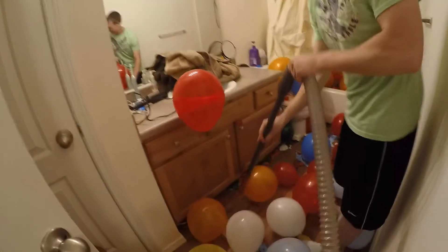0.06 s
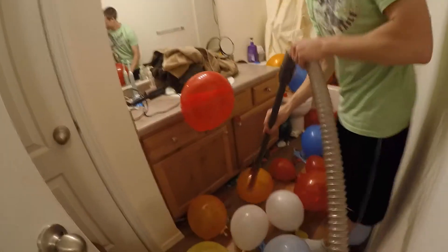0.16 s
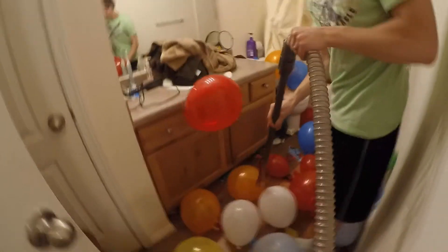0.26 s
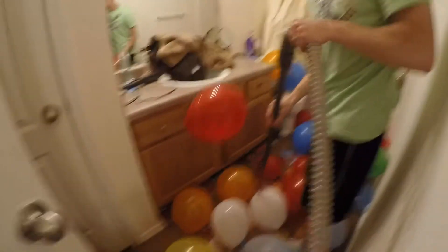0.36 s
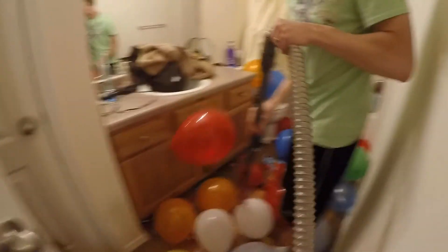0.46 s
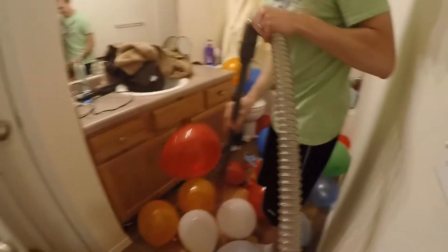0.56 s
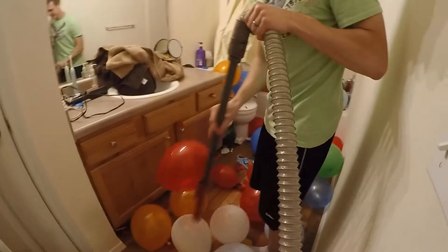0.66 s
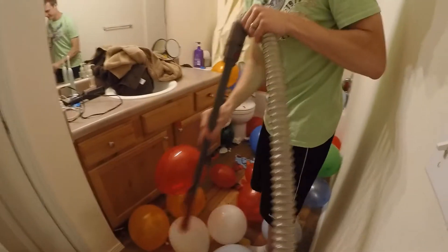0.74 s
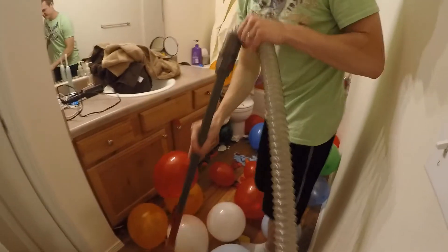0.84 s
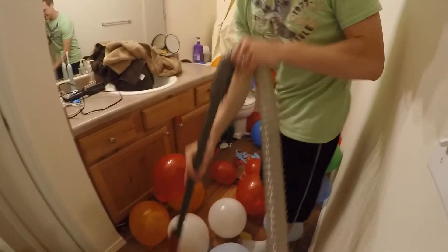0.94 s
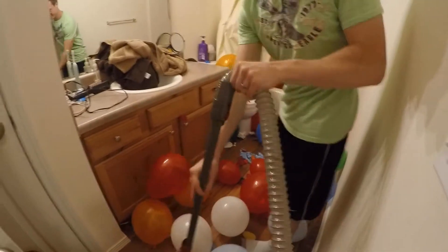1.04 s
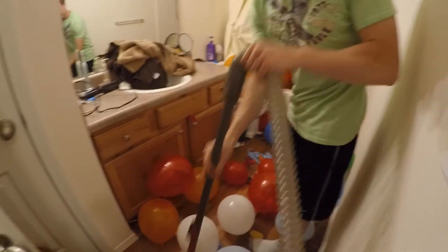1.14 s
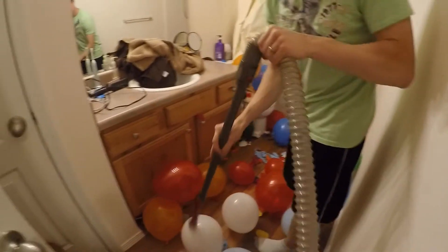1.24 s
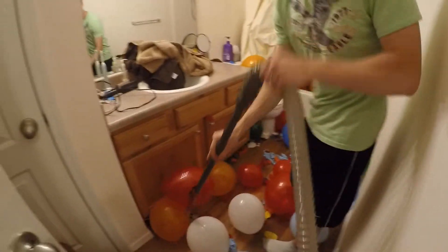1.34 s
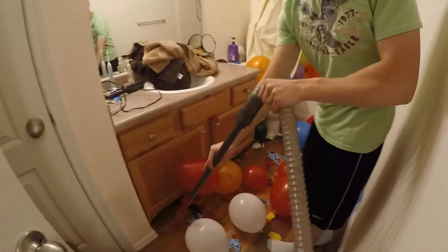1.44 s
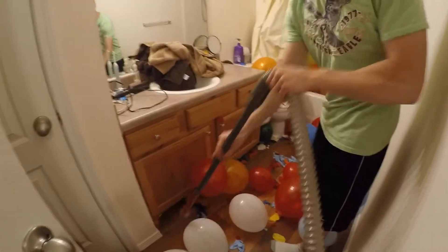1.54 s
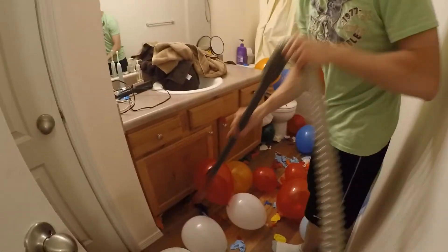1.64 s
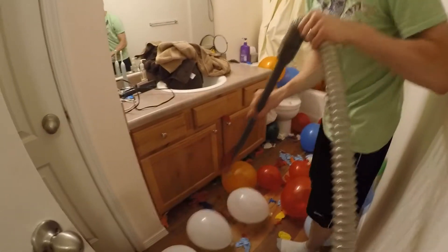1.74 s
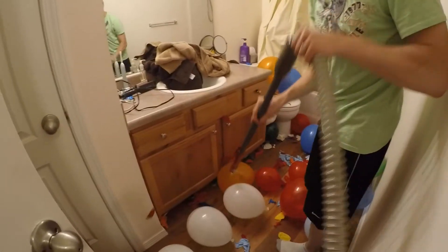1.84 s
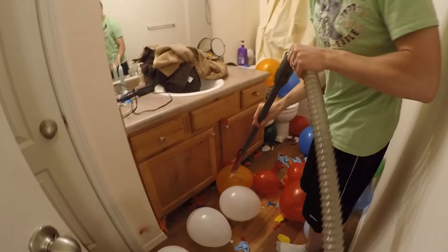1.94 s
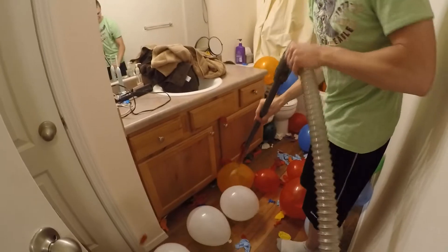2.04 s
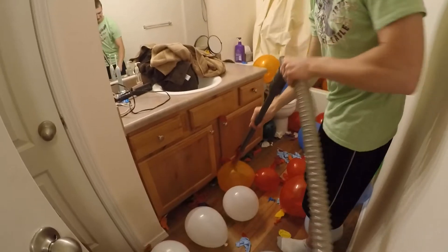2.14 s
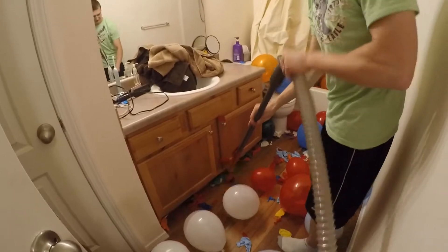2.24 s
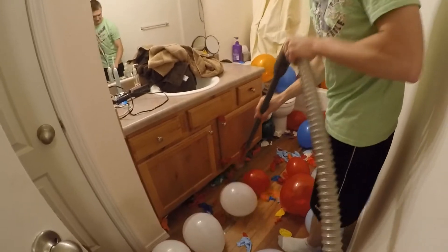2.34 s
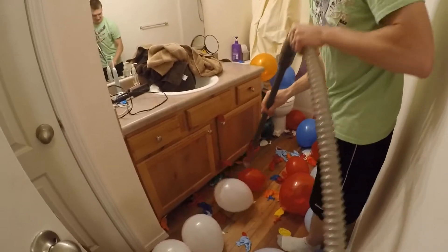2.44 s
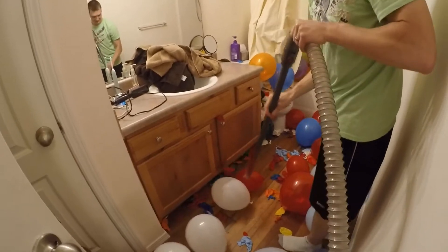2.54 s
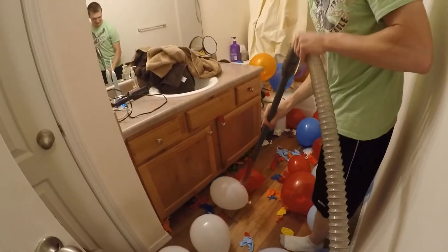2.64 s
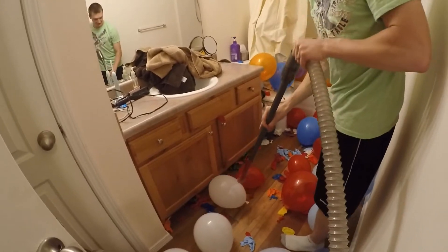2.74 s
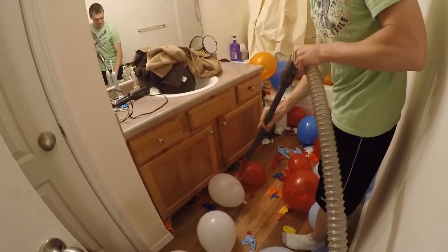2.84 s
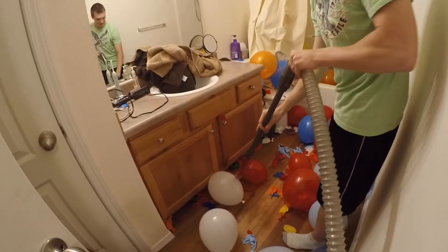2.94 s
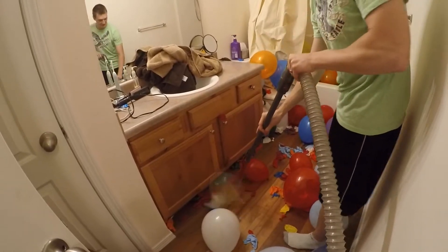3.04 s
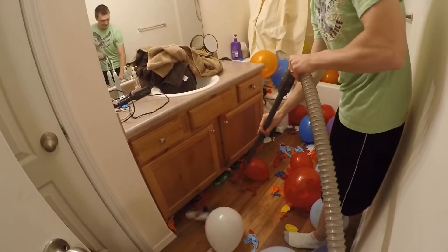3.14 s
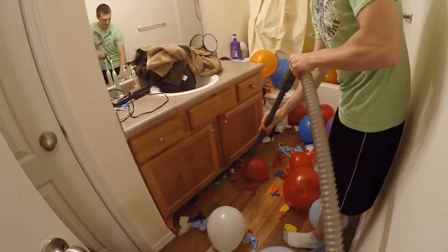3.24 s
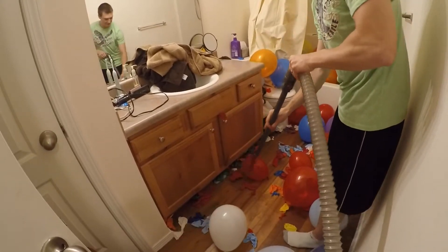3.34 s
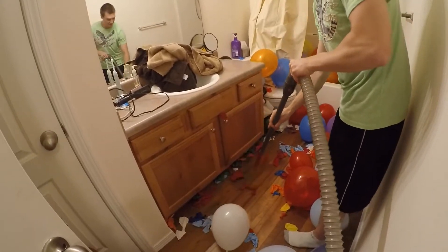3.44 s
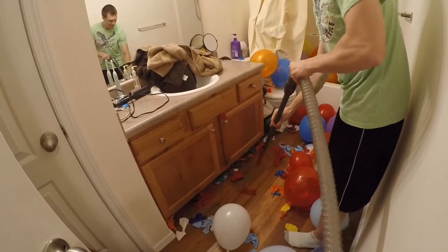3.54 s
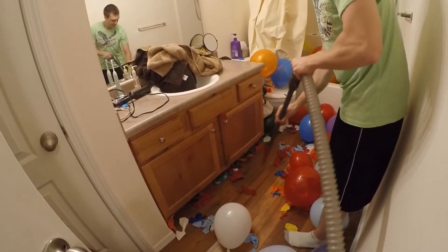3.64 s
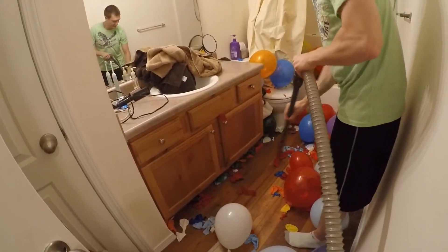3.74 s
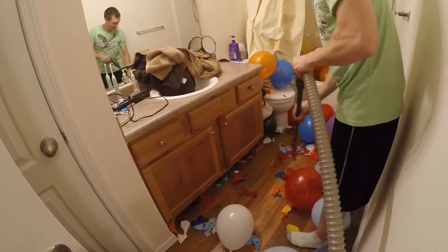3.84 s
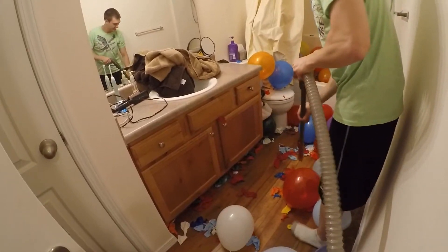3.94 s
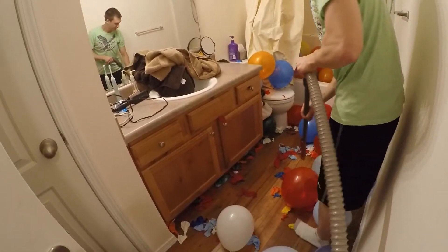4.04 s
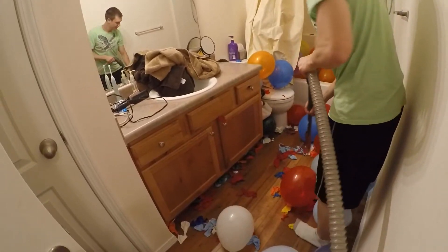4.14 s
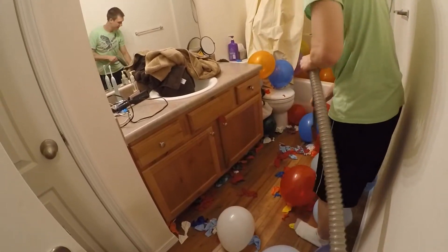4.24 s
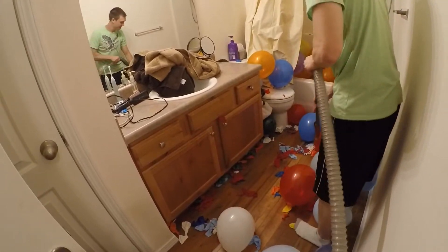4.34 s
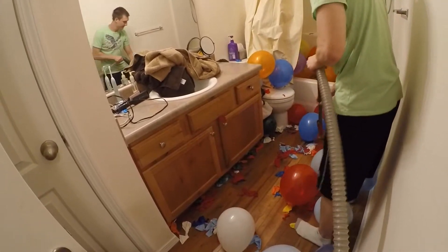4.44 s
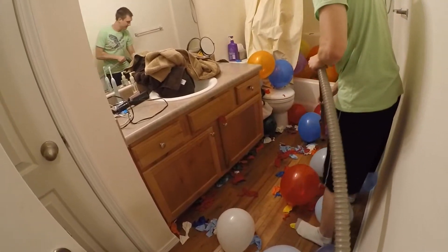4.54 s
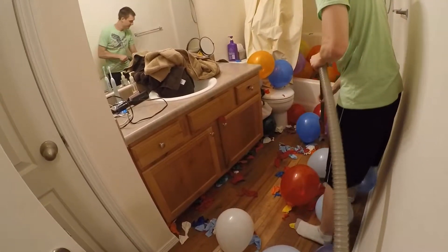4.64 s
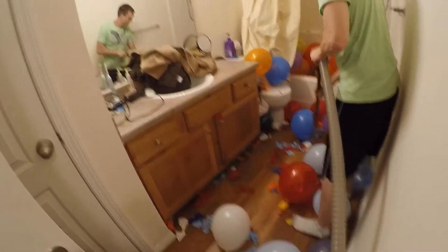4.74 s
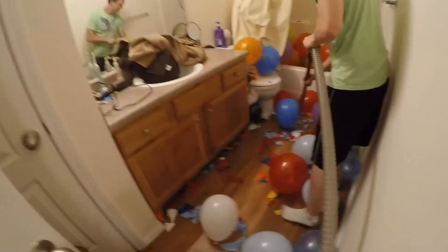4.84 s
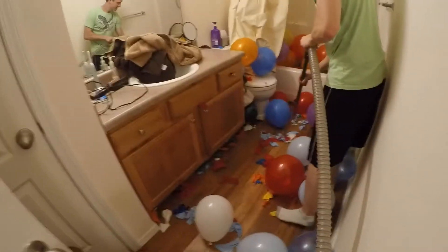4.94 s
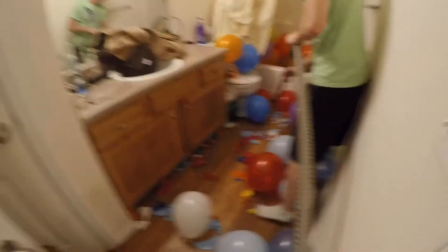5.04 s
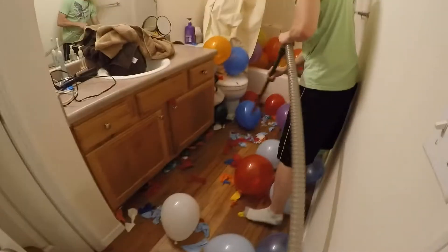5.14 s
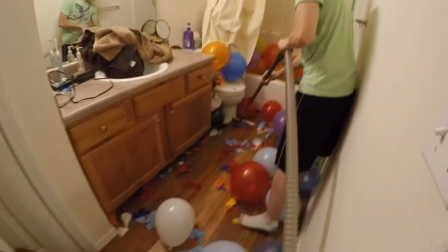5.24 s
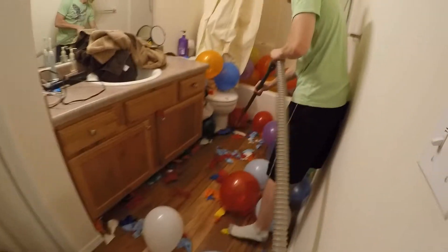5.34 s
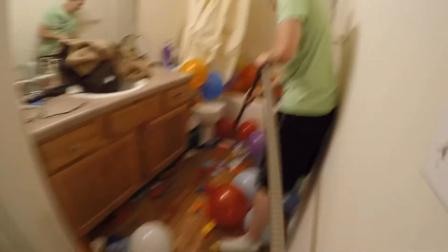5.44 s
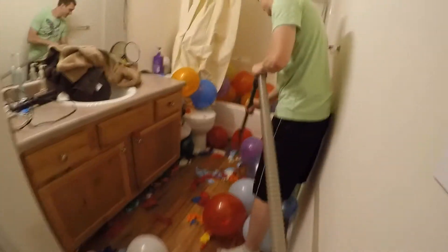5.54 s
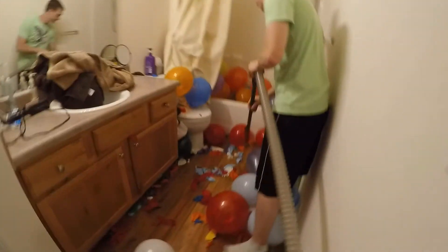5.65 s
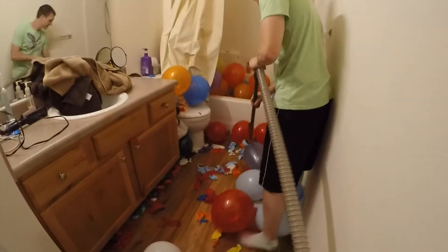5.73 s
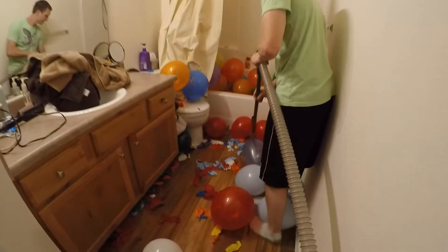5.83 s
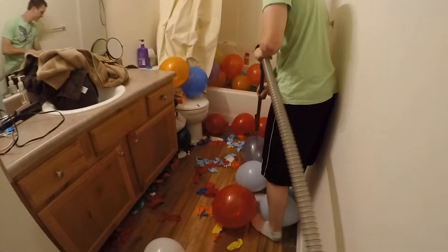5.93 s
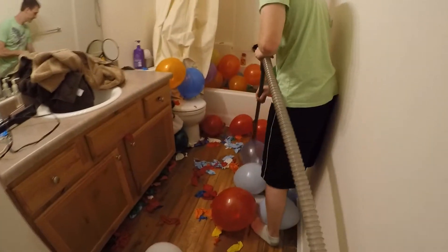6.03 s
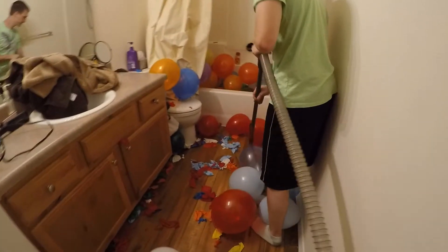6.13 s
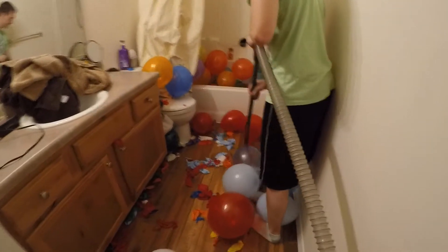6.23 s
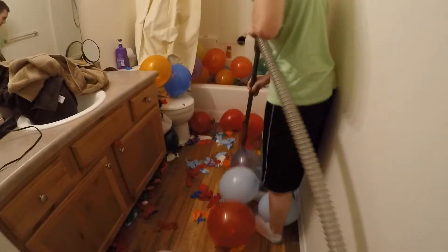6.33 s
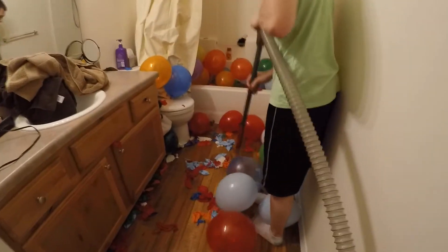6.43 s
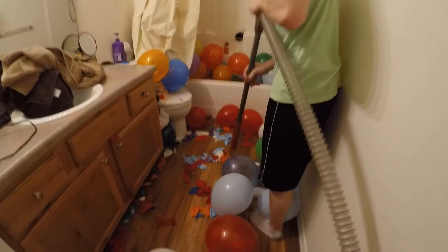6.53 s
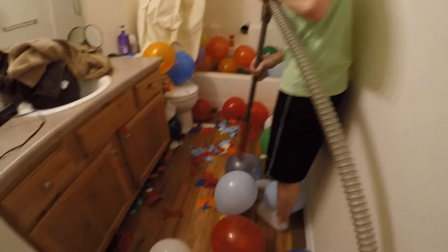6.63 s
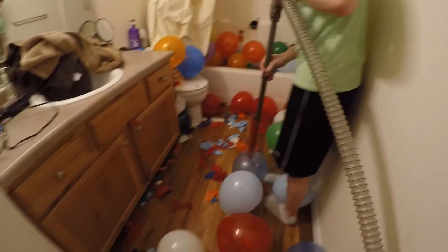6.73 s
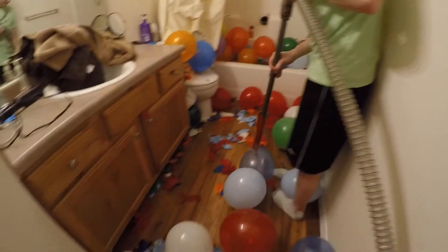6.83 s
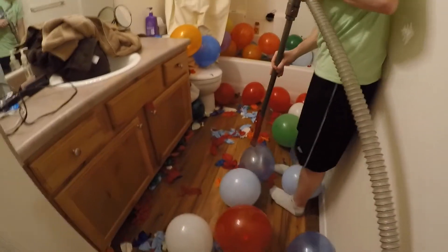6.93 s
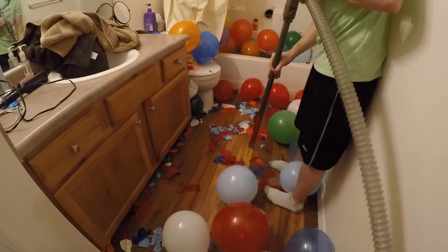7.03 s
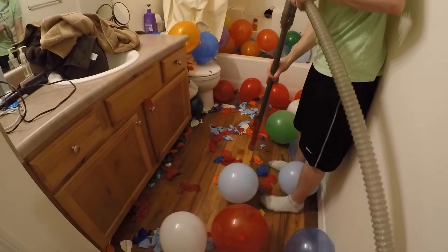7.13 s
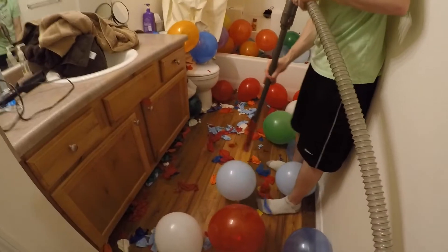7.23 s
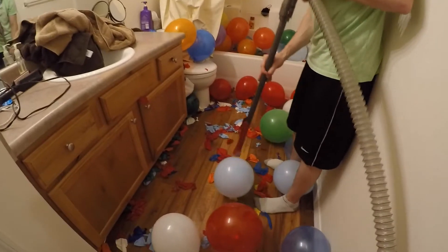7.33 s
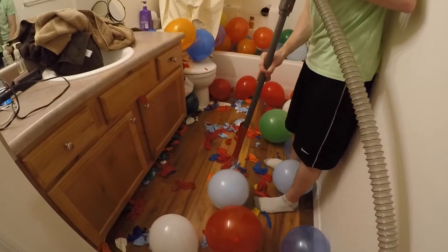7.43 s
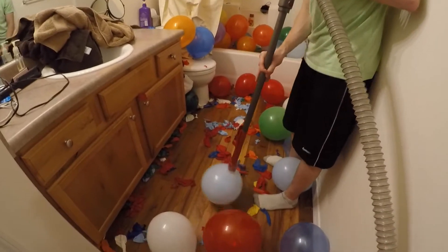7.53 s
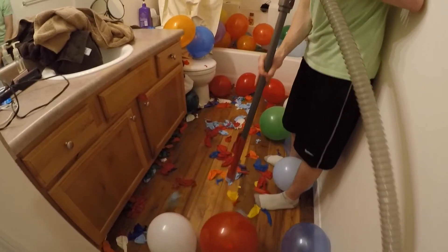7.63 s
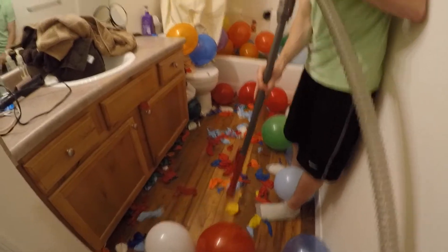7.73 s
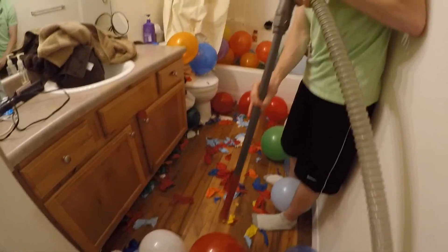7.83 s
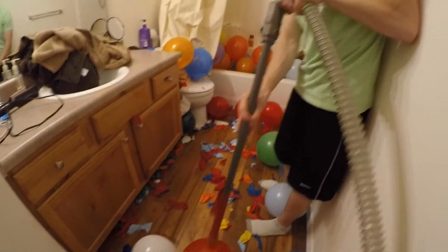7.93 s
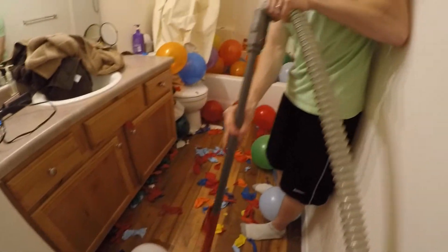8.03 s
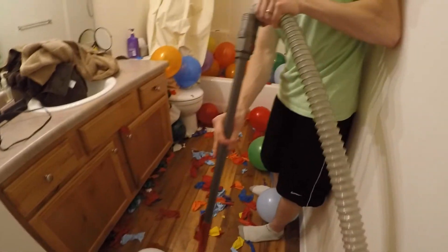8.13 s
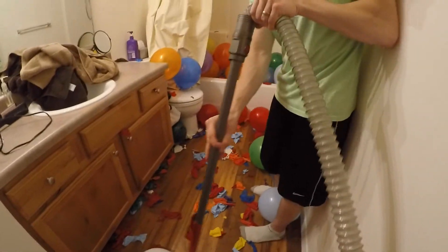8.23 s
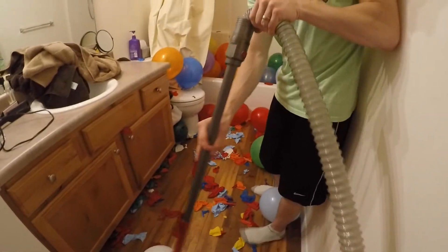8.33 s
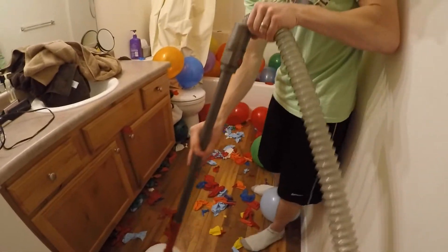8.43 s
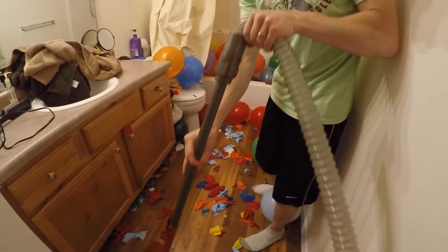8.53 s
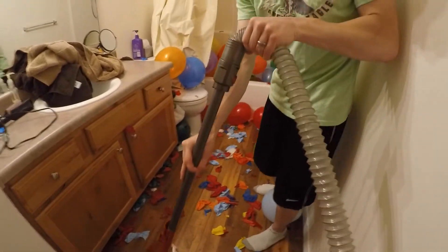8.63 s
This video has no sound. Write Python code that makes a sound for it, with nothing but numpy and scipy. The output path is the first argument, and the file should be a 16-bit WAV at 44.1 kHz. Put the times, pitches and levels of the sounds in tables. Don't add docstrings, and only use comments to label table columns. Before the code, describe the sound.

The tail of an earlier pop fades into vacuum suction, then balloons explode every half second or so, very loud against the quiet air rush. The close handheld microphone overloads on each boom, and hard walls answer with a brief fluttering ring. A longer gap follows around the middle, with rising hiss, tiny scrap ticks and soft bumps, before four final bursts.

```python
import sys
import numpy as np
from scipy import signal
from scipy.fft import rfft, irfft, next_fast_len
from scipy.io import wavfile

SR = 44100
rng = np.random.default_rng(int(sys.argv[2]) if len(sys.argv) > 2 else 0)


def inscribe(sig):
    pcm = np.round(np.clip(np.atleast_2d(sig).T, -1, 1) * 32767)
    wavfile.write(sys.argv[1], SR, pcm.astype(np.int16))


def how_loud(loudness_db):
    steps = np.asarray(loudness_db, float) / 20
    return 10 ** steps


N = 382788

# (t/s, swing f/Hz, overload level/dB)
FREED_AIR = [(.9514, 245, 8), (1.3931, 250, 9), (1.7125, 205, 7), (2.2255, 230, 3), (3.0605, 260, 6),
             (3.4392, 210, 2), (3.8602, 200, 4), (4.4657, 205, 8), (5.2072, 205, 9), (5.6192, 195, 8),
             (7.0522, 200, 6), (7.5958, 230, 5), (8.0050, 200, 4), (8.5583, 220, 12), (-.075, 220, 6)]
# (t/s, low level/dB, 1.5 kHz level/dB, bright level/dB, gain left after it/dB)
ROOM_ANSWERS = [(0.95, -5.5, -13, -11.5, -42), (1.39, -4, -13.5, -13, -40), (1.712, -9, -12, -11.5, -42.5),
                (2.224, -11, -7, -9.5, -41.5), (3.057, -7.5, -10.5, -12, -40),
                (3.437, -10.5, -12, -12, -38), (3.86, -13, -10, -12, -36), (4.466, -5, -9.5, -9.5, -39),
                (5.207, -4, -13, -8.5, -39.5), (5.62, -8.5, -9.5, -5.5, -43.5), (7.05, -9, -9.5, -10, -42),
                (7.593, -10, -11, -9.5, -40.5), (8.002, -9, -10.5, -9, -41.5),
                (8.556, -9.5, -14.5, -11, -39)]
# (t/s, slap level/dB, slap f/Hz, flutter level/dB, flutter f/Hz)
SLAPS = [(0.9548, -8.5, 9500, -12, 1125), (1.3939, -10.5, 4220, -14, 1024), (1.7129, -12, 4400, -9, 1639),
         (2.226, -18.5, 6200, -7.5, 1803), (3.0607, -12, 5270, -7, 1370), (3.4392, -17, 3930, -10, 1733),
         (3.8612, -16, 2770, -4.5, 1660), (4.4677, -10, 2540, -10, 2310), (5.2083, -14, 3670, -17, 1930),
         (5.6204, -10, 6560, -7, 1667), (7.0529, -5, 2800, -4.5, 1366), (7.5963, -8, 2650, -10, 1190),
         (8.0066, -10, 7550, -10, 1637), (8.5627, -9, 9600, -11, 1153)]
EARLIER_ANSWER, EARLIER_SPOT = (-.075, -6, -7, -10.5, -38.5), (-.075, -8, -23, -6.5, -1.5)
THIRD_OCTAVES_HZ = 32 * 2 ** np.arange(0, 9.3, 1 / 3)
TEAR_S = .0013
STEP_IN_S = (5.33, 5.38)
DUCK_AHEAD_S = .016
SEAL_S = 0.07


def rms_one(x):
    return x / np.sqrt(np.mean(x ** 2) + 1e-20)


def at_hz(points, hz):
    points = np.array(points)
    return np.interp(np.log(hz), np.log(points[:, 0]), points[:, 1])


def band(x, low, high):
    return signal.sosfilt(signal.butter(2, [low, high], "band", fs=SR, output="sos"), x)


def drift(rate):
    r = np.exp(-80 * np.pi * rate / SR)
    draws = rng.standard_normal(N // 40 + 2002)
    slow = signal.lfilter([1], [1, -2 * r, r * r], draws)[2000:]
    return np.interp(np.arange(N) / 40, np.arange(len(slow)), rms_one(slow))


def resonance(x, hz, width):
    r = np.exp(-np.pi * width / SR)
    poles = [1, -2 * r * np.cos(2 * np.pi * hz / SR), r * r]
    return signal.lfilter([(1 - r * r) / 2, 0, (r * r - 1) / 2], poles, x)


def add(out, x, s):
    i = round(s * SR)
    x = x[max(-i, 0):N - i]
    out[max(i, 0):max(i, 0) + len(x)] += x


def burst(boom, answer, spot, top_db):
    t = np.arange(round(.6 * SR)) / SR
    late = np.maximum(t - TEAR_S, 0)
    white = rng.standard_normal((2, len(t)))
    tear = 0.17 * np.sin(2 * np.pi * t / TEAR_S) * (t < TEAR_S)
    rise = 1 - np.exp(-t / .0013)
    rip = how_loud(7.3 - 60 * t / 0.016) * rise * band(white[1], 1260, 2600)
    build = 1 - np.exp(-(late / 0.00077) ** 2)
    ringing = how_loud(-4.5) * build * room_modes(t, spot)
    hiss = how_loud(19.0) * rise * room_tail(t, white, answer, spot[-1], top_db)
    return tear + rip + air_swing(late, *boom) + ringing + hiss


def air_swing(late, hz, overload_db):
    fade = np.exp(-(late * hz / 1.6) ** 4)
    swing = how_loud(overload_db - 2) * np.sin(2 * np.pi * hz * late) * fade
    return band(swing, 52, 4000)


def room_modes(t, spot):
    # (f/Hz, level/dB, t60/s)
    modes = [(65, -14, 0.42), (129.5, 5.5, 0.13), (177.8, -7, 0.28), (213.8, -2.5, 0.28), (229.4, -5, 0.42),
             (290.4, -4.5, 0.38), (343.7, -4, 0.36), (472.3, 0, 0.12), (651, -9, 0.32), (916, -16, 0.37)]
    feed = np.c_[[110, 180, 230, 300, 560], [*spot[:-1], -11.5, spot[-1] - 8.0]]
    ringing = 0
    for hz, level_db, t60 in modes:
        strength_db = level_db + at_hz(feed, hz) + rng.normal(0, 1.3)
        ringing = ringing + how_loud(strength_db - 60 * t / t60) * np.sin(2 * np.pi * (hz * t + rng.random()))
    return ringing


def room_tail(t, white, answer, upper_db, top_db):
    # (f/Hz, level per Hz/dB)
    colour = [(18, -52), (30, -32), (90, -21), (199, -1.5), (384, -9), (526, -11.5), (600, -18),
              (1810, -15), (2750, -25.5), (6550, -27), (11700, -30.5), (14800, -32), (16000, -59)]
    # (f/Hz, t60/s)
    reverb = [(60, 0.6), (160, 0.34), (420, 0.32), (1100, 0.34), (2900, 0.31), (7700, 0.32), (14000, .22)]
    low_db, mid_db, bright_db, _ = answer
    bright_db = bright_db + 8.5
    own = np.c_[[280, 560, 1500, 6000, 12000],
                [low_db, upper_db, mid_db + 5.5, bright_db, bright_db + top_db]]
    tail = 0
    for k, (low, high) in enumerate(zip(THIRD_OCTAVES_HZ, THIRD_OCTAVES_HZ[1:])):
        hz = np.sqrt(low * high)
        decay_db = 60 * t / at_hz(reverb, hz)
        tail = tail + how_loud(at_hz(colour, hz) + at_hz(own, hz) - decay_db) * band(white[k % 2], low, high)
    return tail


def flutter():
    out, t = np.zeros(N), np.arange(round(.3 * SR)) / SR
    rise = 1 - np.exp(-t / .0012)
    for (s, *_), (*_, peak_db, hz) in zip(FREED_AIR, SLAPS):
        spread = np.linspace(-.14, .14, num=6)[:, None] + rng.normal(0, 0.0183, (6, 1))
        phase = rng.random((6, 1))
        ring = np.sin(2 * np.pi * (hz * (1 + spread) * t + phase)).sum(axis=0)
        add(out, how_loud(peak_db - 16.0 - 60 * t / 0.31) * rise * ring, s - TEAR_S)
    return out


def snaps(table, gain_db, rise_s, t60):
    out, t = np.zeros(N), np.arange(round(.08 * SR)) / SR
    for s, peak_db, hz, *_ in table:
        noise = band(rng.standard_normal(len(t)), .5 * hz, min(2.33 * hz, 13000))
        add(out, how_loud(peak_db + gain_db - 60 * t / t60) * (1 - np.exp(-t / rise_s)) * noise, s)
    return out


def recorder_gain(t):
    settle_s, recover_db_per_s, seal_db = 0.16, 13.5, 1
    booms = [FREED_AIR[-1], *FREED_AIR[:-1]]
    answers = [EARLIER_ANSWER, *ROOM_ANSWERS]
    s = np.array([boom[0] for boom in booms])
    pulled_db = np.array([answer[-1] for answer in answers])
    until = np.append(s[1:], N / SR + settle_s)
    top_db = pulled_db + recover_db_per_s * (until - s - settle_s)
    gain_db = np.interp(t, np.c_[s + settle_s, until].ravel(), np.c_[pulled_db, top_db].ravel())
    for u in s:
        gain_db = gain_db + np.interp(t - u, [-SEAL_S, -DUCK_AHEAD_S, settle_s], [0, seal_db, 0])
    return gain_db


def suction():
    # (f/Hz, level per Hz/dB)
    door_air = [(71, -32), (120, -10.5), (177, -15), (341, -10), (427, -15), (757, -4), (1070, -6.5),
                (1340, 0.5), (2380, -4), (2870, -10.5), (8480, -13.5), (14700, -29), (16000, -51)]
    # (f/Hz, level per Hz/dB)
    inside_air = [(71, -42), (120, -14.5), (181, -7), (334, -20.5), (605, -8), (742, -4.5), (789, -5),
                  (1090, -4.5), (1750, 0.5), (3660, -13), (6630, -12), (14700, -31.5), (16000, -56)]
    # (t/s, level/dB)
    aim = [(0.15, -1.4), (0.75, 1), (1.3, 1), (1.95, -1), (2.2, -1.3), (2.6, 0.5), (3.0, -0.5), (3.7, -1),
           (4.3, -2.3), (4.8, -3.1), (5.15, 1.1), (5.5, 4), (6.0, 3.1), (6.4, 0.2), (7.0, 1.7), (7.3, -3),
           (7.55, 4), (8.4, 2.5)]
    # (f/Hz, level against hiss/dB)
    fan = [(5568, -19), (11125, -28)]
    t = np.arange(N) / SR
    gain_db, aim_db = recorder_gain(t), np.interp(t, *np.transpose(aim))
    inside = np.interp(t, STEP_IN_S, [0, 1])
    white, gust, layers = rng.standard_normal((2, N)), drift(6.9), np.zeros((3, N))
    piped = through_wand(white)
    for k, (low, high) in enumerate(zip(THIRD_OCTAVES_HZ[6:], THIRD_OCTAVES_HZ[7:])):
        hz = np.sqrt(low * high)
        source = piped if 500 < low < 2500 else white
        door_db = at_hz(door_air, hz)
        level_db = door_db + inside * (at_hz(inside_air, hz) - door_db + .1)
        flutter_db = .5 * gust + 1.1 * drift(10.0)
        layer = np.searchsorted([500, 2800], low)   # Hz, where drone meets roar and roar meets hiss
        layers[layer] += how_loud(level_db + flutter_db) * band(source[k % 2], low, high)
    drone, roar, hiss = layers / np.std(layers, axis=1, keepdims=True)
    roar = roar + whistles(inside)
    for hz, level_db in fan:
        hiss = hiss + how_loud(level_db) * np.sin(2 * np.pi * hz * t + 1.5 * gust)
    drone = drone + how_loud(-3 - 11.0 * inside) * np.sin(2 * np.pi * 121 * t)
    drone_db = gain_db - 13 - 2.5 * inside + 0.5 * drift(6.0)
    roar_db = gain_db + 0.36 * aim_db + 0.5
    hiss_db = gain_db - 4.0 + aim_db
    return how_loud(drone_db) * drone + how_loud(roar_db) * roar + how_loud(hiss_db) * hiss


def through_wand(white):
    spacing_hz, echo = 196, 0.19
    size = next_fast_len(N)
    hz = np.fft.rfftfreq(size, 1 / SR)
    pipe = 1 / (1 - echo * np.exp(-2j * np.pi * hz / spacing_hz))
    return irfft(rfft(white, size) * pipe, size)[:, :N]


def whistles(inside):
    # (f/Hz, width/Hz, level over roar at the door/dB, level over roar inside/dB)
    lines = [(2400, 19, -13.5, -20), (2380, 57, -9.5, -13), (1366, 13, -14.5, -16.5), (1732, 190, -9, -19),
             (800, 46, -30, -17.5), (608, 7, -25, -15.5), (1585, 25, -15.5, -16), (1938, 36, -15, -21),
             (338, 130, -29, -18.5), (4690, 130, -19.5, -20)]
    white, out = rng.standard_normal(N), np.zeros(N)
    for hz, width, door_db, inside_db in lines:
        whistle = rms_one(resonance(resonance(white, hz, width), hz, width))
        out += how_loud(door_db + inside * (inside_db - door_db) + 1.2 * drift(6.0)) * whistle
    return out


def hand_rumble():
    # (t/s, level/dB)
    grip = [(0.0, -50), (0.26, -54), (1.74, -56), (1.93, -60), (2.95, -70), (3.22, -61), (3.72, -56),
            (4.47, -55.5), (6.53, -57), (7.01, -48), (8.53, -65), (8.68, -40.5)]
    grip_db = np.interp(np.arange(N) / SR, *np.transpose(grip))
    rumble = how_loud(2.0 * drift(4.3)) * band(band(rng.standard_normal(N), 15, 64), 9.1, 130)
    return how_loud(grip_db + 4.0) * rms_one(rumble)


def knocks():
    # (t/s, peak level/dB, f/Hz)
    bumps = [(1.35, -27, 220), (4.762, -31, 137), (4.871, -31, 133), (5.072, -28, 133), (5.374, -24, 150),
             (5.795, -32, 45.4), (6.048, -40, 40.4), (6.245, -31.5, 270), (6.46, -30, 59.2),
             (6.458, -36, 270), (6.55, -35, 45.8)]
    out, t = np.zeros(N), np.arange(round(.2 * SR)) / SR
    rise = 1 - np.exp(-t / .004)
    for s, peak_db, hz in bumps:
        t60 = 0.028 + 3.4 / hz
        body = np.sin(2 * np.pi * hz * t) + 0.24 * np.sin(2 * np.pi * 2.6 * hz * t)
        add(out, how_loud(peak_db + 5.5 - 60 * t / t60) * rise * body, s)
    return out


def scene():
    # (t/s, level under 150 Hz/dB, 180 Hz/dB, 230 Hz/dB, 560 Hz/dB)
    spots = [(0.947, -4, -1.5, -14, -3), (1.389, -9, -9, -7.5, -2.5), (1.709, -13.5, -9, -5.5, -4),
             (2.222, -21, -6, -6.5, -6.5), (3.055, -14.5, -3, -7, -4.5), (3.435, -32, -24.5, -10, -2),
             (3.858, -25, -10, -8, -3), (4.464, -26, -12, -11, -3), (5.207, -10, -5, -7.5, -5),
             (5.618, -12, 1, -20, -12), (7.049, -8.5, -2.5, -6, -1.5), (7.592, -12.5, -6, -16, -4),
             (8.001, -7, -8.5, -17, -6), (8.554, -10, -19, -16.5, -0.5)]
    # (t/s, peak level/dB, f/Hz)
    ticks = [
        (4.4398, -26, 2620),
        (4.7566, -35, 2790),
        (4.87, -33, 3590),
        (5.07, -25, 3030),
        (5.1771, -31, 3000),
        (8.522, -30, 6660),
    ]
    t, duck_db = np.arange(N) / SR, np.zeros(N)
    bursts = snaps(SLAPS, gain_db=18.5, rise_s=0.0013, t60=0.018) + flutter()
    answers = [*ROOM_ANSWERS, EARLIER_ANSWER]
    for (s, *boom), answer, spot in zip(FREED_AIR, answers, [*spots, EARLIER_SPOT]):
        dip_db = -10 - 0.69 * (recorder_gain(s - SEAL_S) + 32.5)
        dip_times = [-1.3 * DUCK_AHEAD_S, -.7 * DUCK_AHEAD_S, 0, .12]
        duck_db += np.interp(t - s, dip_times, [0, dip_db, dip_db, 0])
        top_db = -6 * (s > STEP_IN_S[1])
        add(bursts, burst(boom, answer[1:], spot[1:], top_db), s - TEAR_S)
    scraps = snaps(ticks, gain_db=9.5, rise_s=.0003, t60=0.024)
    background = suction() + hand_rumble() + scraps + knocks()
    return (how_loud(duck_db) * background + bursts)[None]


def band_limit(x):
    return signal.sosfilt(signal.butter(12, 16450, fs=SR, output="sos"), x)


def record(dry):
    top = .9
    clipped = dry / (1 + np.abs(dry / top) ** 5) ** .2
    cut = signal.sosfilt(signal.cheby2(10, 50, 15900, fs=SR, output="sos"), clipped)
    return band_limit(cut)


dry = scene()
out = record(dry)
inscribe(out)
```